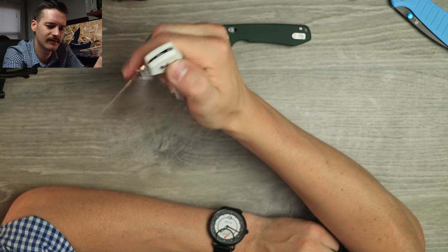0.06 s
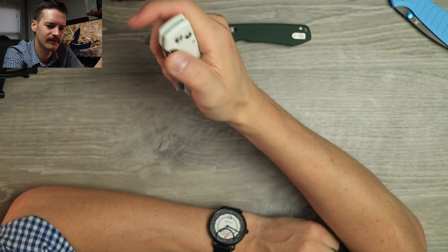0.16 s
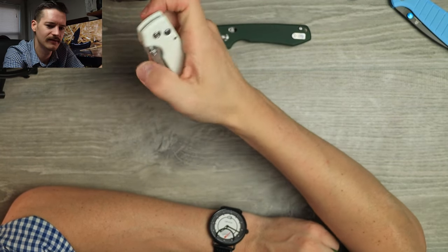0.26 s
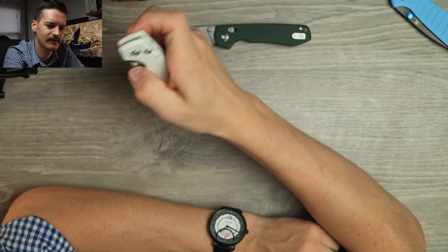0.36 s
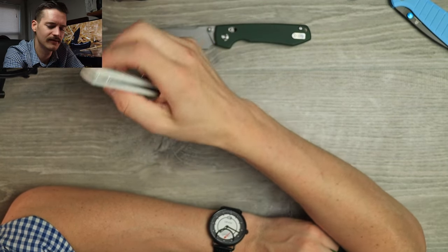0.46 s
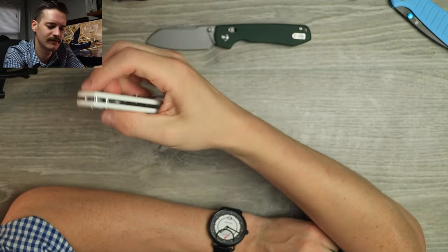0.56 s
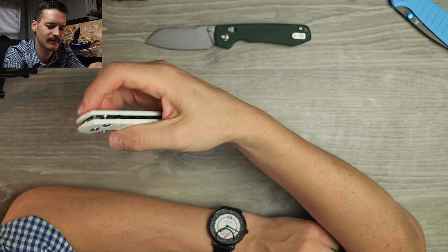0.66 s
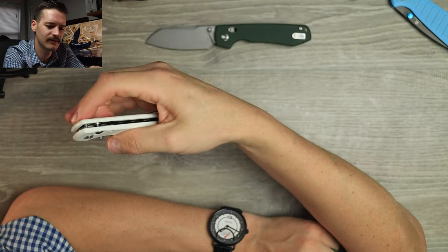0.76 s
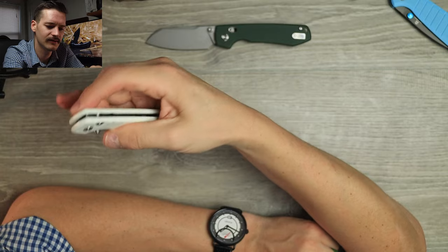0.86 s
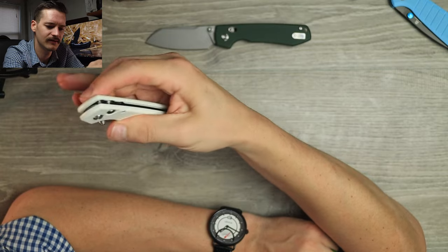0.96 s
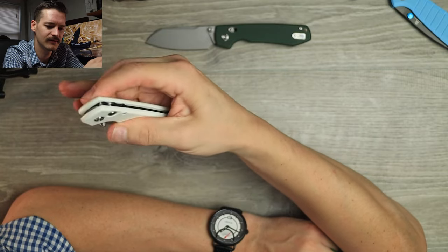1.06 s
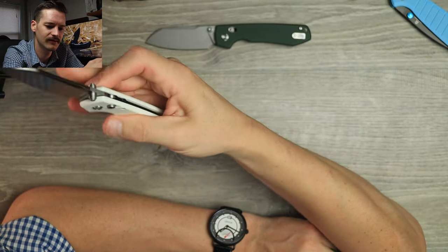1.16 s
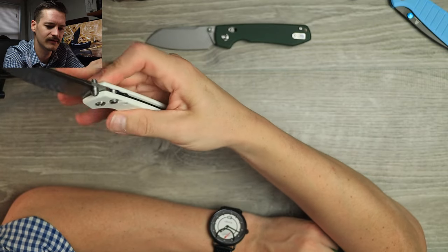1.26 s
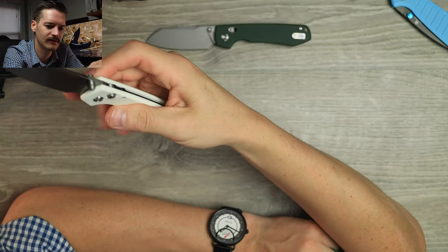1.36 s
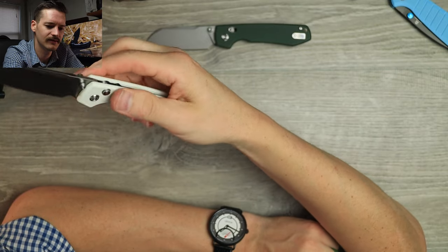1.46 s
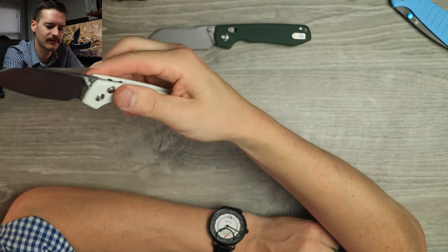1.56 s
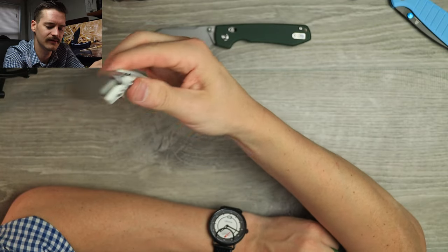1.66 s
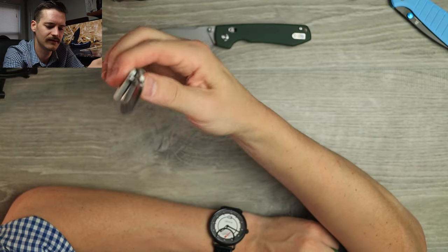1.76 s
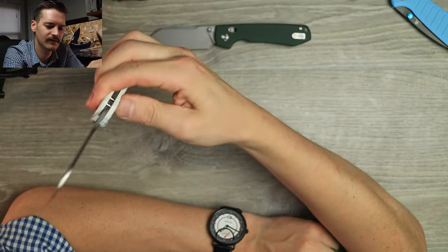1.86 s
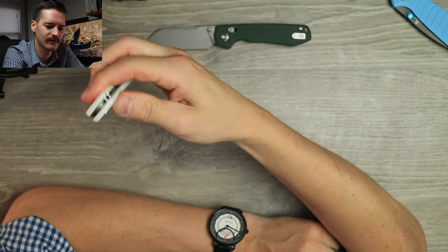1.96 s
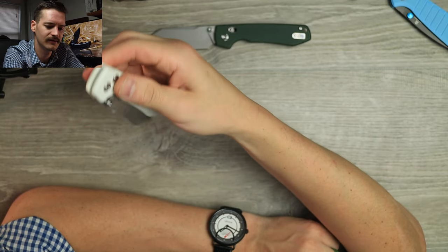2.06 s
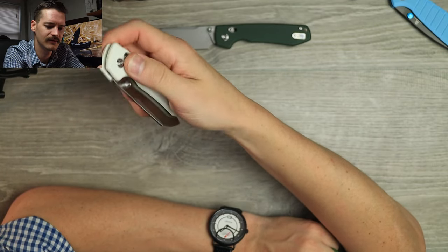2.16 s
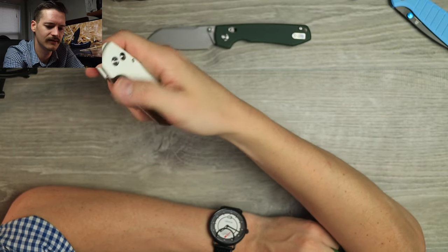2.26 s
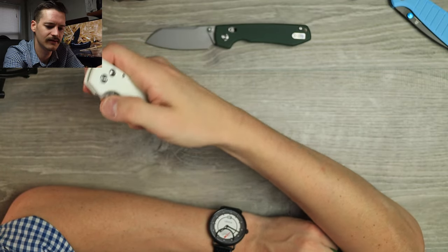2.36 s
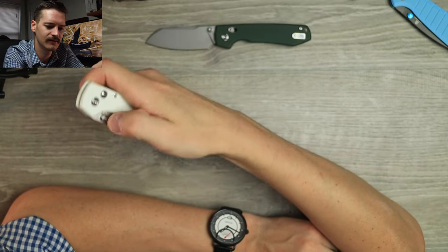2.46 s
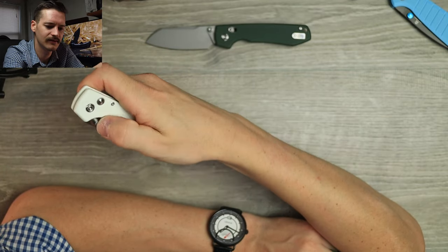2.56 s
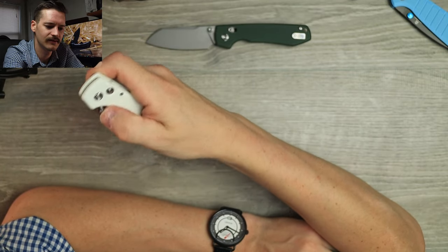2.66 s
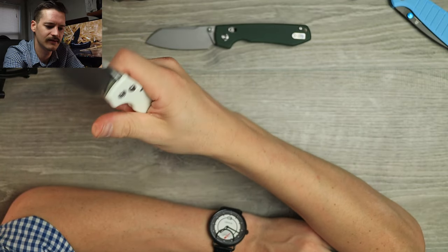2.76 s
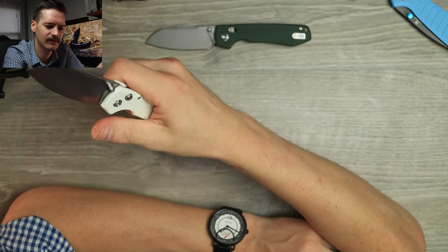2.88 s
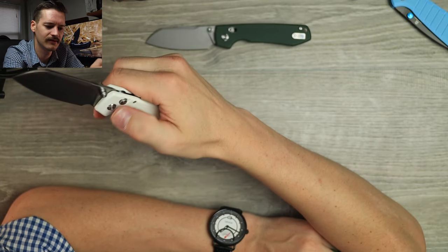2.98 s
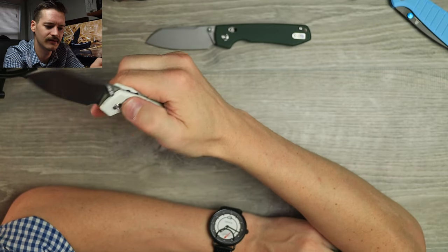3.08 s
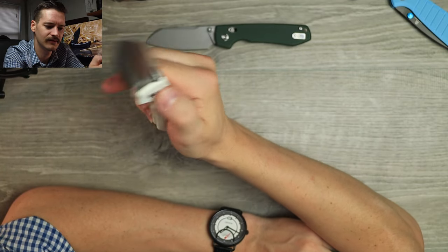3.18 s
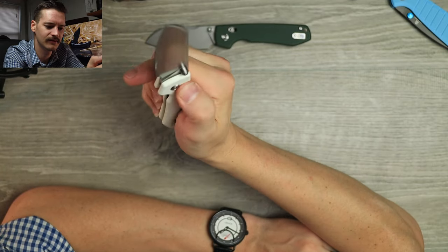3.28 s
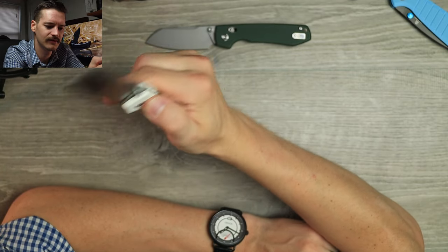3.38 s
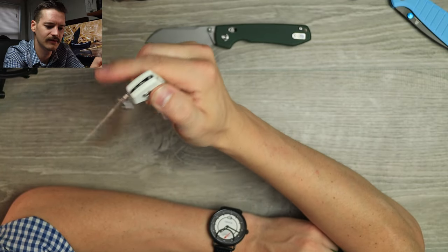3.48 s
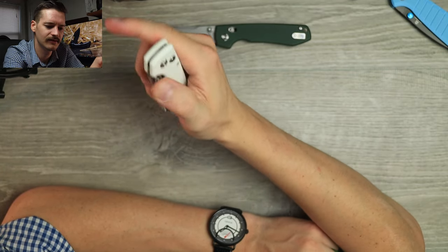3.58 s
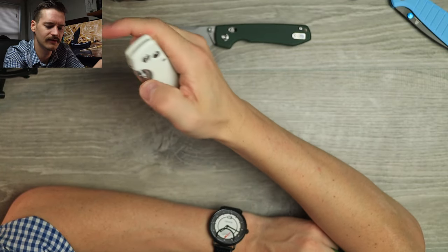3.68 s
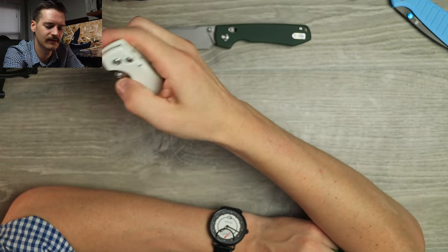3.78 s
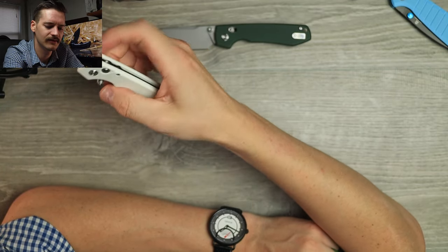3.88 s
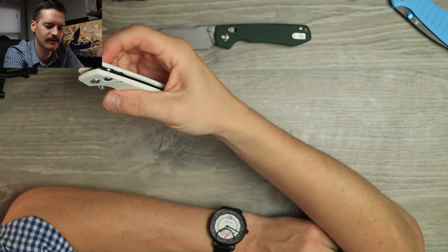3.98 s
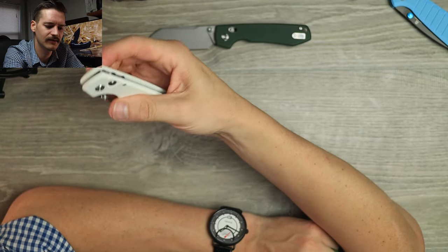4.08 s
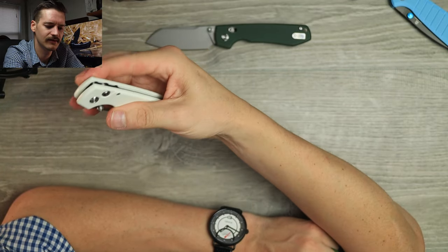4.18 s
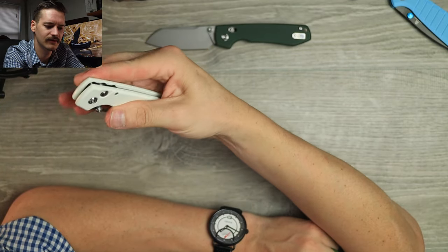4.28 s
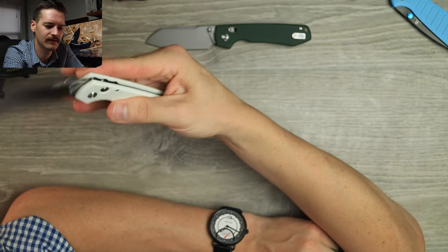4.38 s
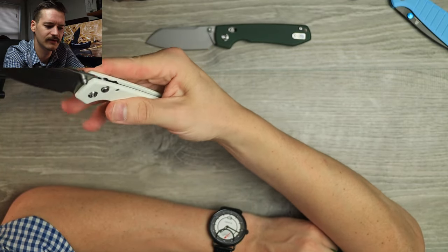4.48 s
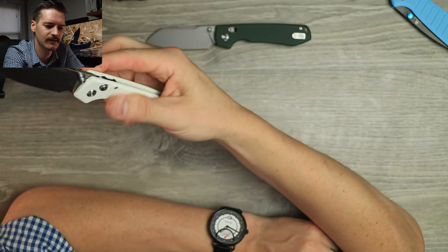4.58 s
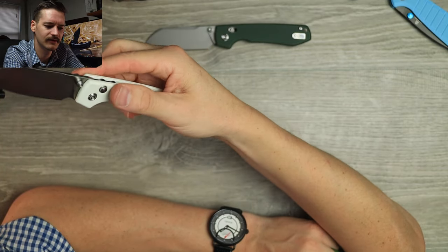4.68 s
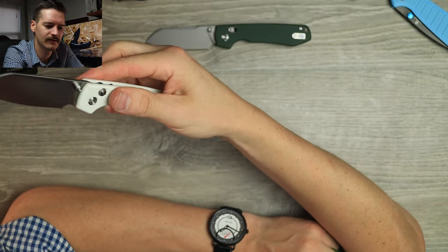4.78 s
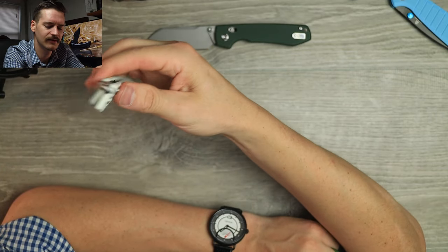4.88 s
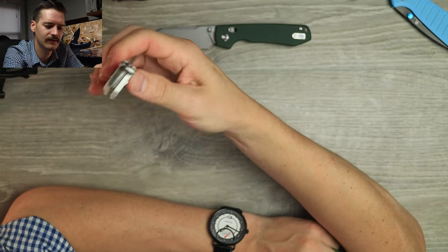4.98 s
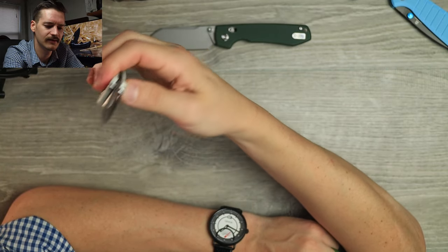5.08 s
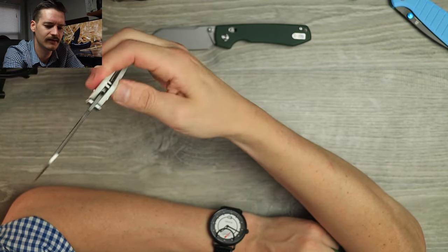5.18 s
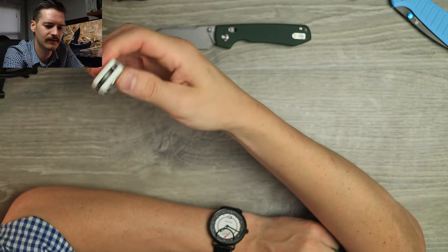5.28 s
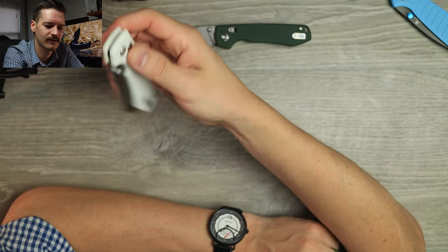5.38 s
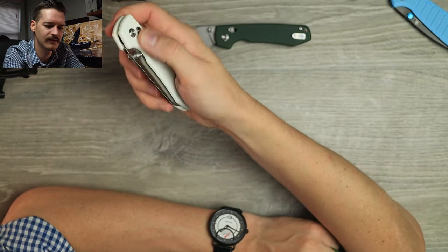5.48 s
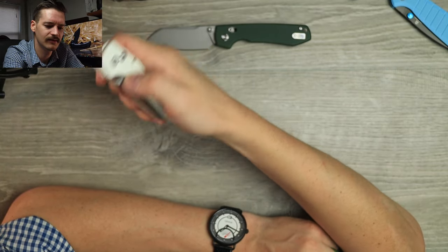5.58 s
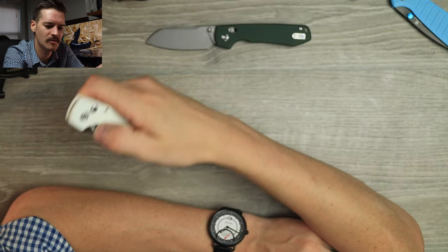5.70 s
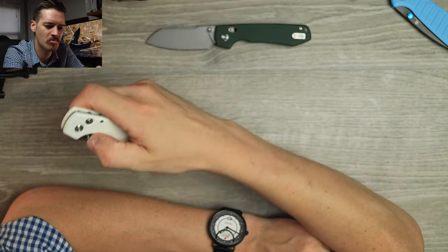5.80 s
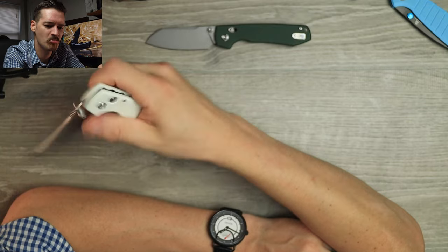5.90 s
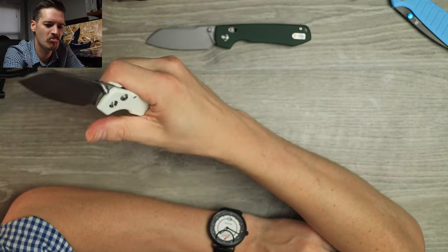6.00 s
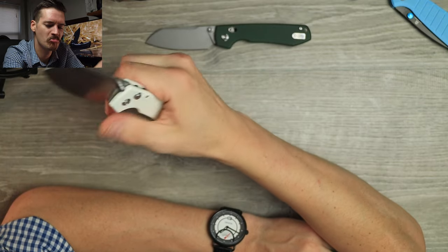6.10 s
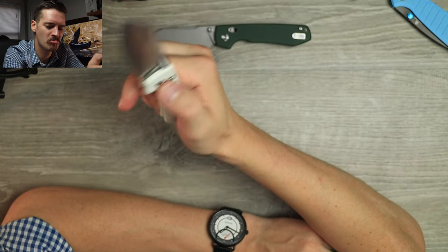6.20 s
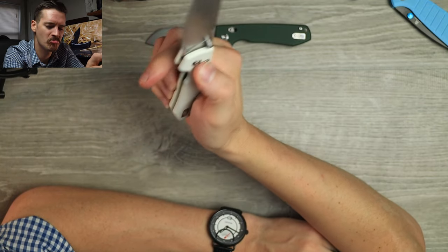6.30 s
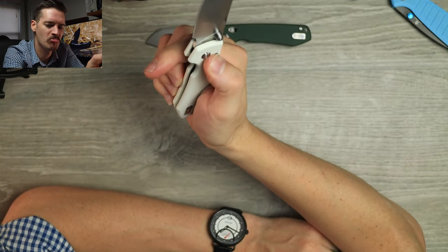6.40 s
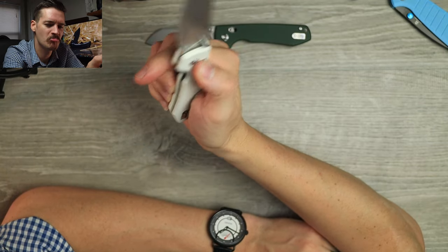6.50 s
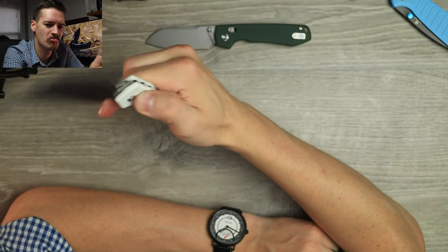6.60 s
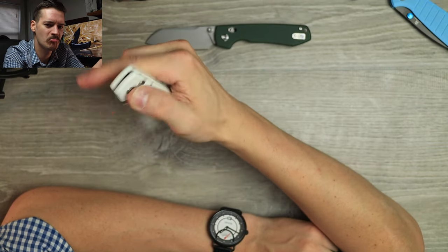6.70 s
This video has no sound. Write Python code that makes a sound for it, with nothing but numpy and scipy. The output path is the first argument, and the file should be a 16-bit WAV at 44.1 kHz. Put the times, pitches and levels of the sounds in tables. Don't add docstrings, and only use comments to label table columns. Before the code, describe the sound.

Close up in a small quiet room, a folding knife is flicked open and dropped shut four times with sharp steel snaps, faint ringing and finger rustle.

```python
import sys
import numpy as np
from scipy import signal
from scipy.fft import rfft, irfft
from scipy.io import wavfile
from scipy.ndimage import uniform_filter1d

SR = 44100
rng = np.random.default_rng(int(sys.argv[2]) if len(sys.argv) > 2 else 0)


def gain_from_db(level_db):
    decades = np.asarray(level_db, float) / 20
    return 10 ** decades


def generate_wav(sig):
    pcm = np.round(np.clip(np.atleast_2d(sig).T, -1, 1) * 32767).astype(np.int16)
    wavfile.write(sys.argv[1], SR, pcm)


N = 297536


def unit(x):
    return x / np.sqrt(np.mean(x ** 2))


def add(out, x, s):
    i = int(s * SR)
    out[i:i + len(x)] += x[:len(out) - i]


def coloured(gain, size=N):
    hz = np.maximum(np.fft.rfftfreq(size, 1 / SR), 1)
    return unit(irfft(rfft(rng.standard_normal(size)) * gain(hz), size))


def resonance(f, hz, width):
    return 1 / (1 + (2 * (f - hz) / width) ** 2)


def modes(hz, db, t60, size):
    t = np.arange(size)[:, None] / SR
    sign = (-1.) ** np.arange(len(hz))
    return sign * gain_from_db(db) * np.cos(2 * np.pi * hz * t) * 1000. ** (-t / t60)


# [f/Hz, width/Hz, level/dB]
FAN_BANDS = [(100, 12, -65), (1168, 45, -73), (1620, 190, -73)]


def fan():
    return sum(gain_from_db(db) * coloured(lambda f: resonance(f, hz, width)) for hz, width, db in FAN_BANDS)


# [f/Hz, level per Hz/dB]
AIR_SPECTRUM = [(20, 1), (33, -8.5), (65, -7.5), (100, -4.5), (150, -9.5), (250, -9), (450, -14.5),
                (650, -20.5), (1200, -20), (2000, -23), (3000, -30), (5000, -38), (9000, -43),
                (16000, -51.5)]


def air():
    hz, db = np.transpose(AIR_SPECTRUM)

    def gain(f):
        return gain_from_db(np.interp(np.log(f), np.log(hz), db)) * np.minimum(f / 14, 1) ** 2

    return gain_from_db(-56.5) * coloured(gain)


# [t/s, level/dB, f/Hz, t60/s, first swing up or down]
DESK_JOLTS = [(0.191, -31.5, 47, 0.11, -1), (1.208, -27, 23, 0.3, -1), (1.211, -34.5, 70, .2, -1),
              (2.058, -36.5, 32, 0.21, 1), (2.8, -37, 47.6, 0.35, 1), (3.59, -43.5, 19, 0.22, 1),
              (3.621, -42.5, 63, 0.198, 1), (4.462, -26, 32, .16, 1), (4.499, -30, 24, .3, 1),
              (5.39, -40.5, 30.4, 0.23, -1), (5.998, -35.5, 73, 0.18, 1), (6.044, -34, 41, 0.21, 1)]


def jolts():
    out = np.zeros(N)
    t = np.arange(SR // 2) / SR
    onset = 1 - np.exp(-t / 0.0053)
    for s, db, hz, t60, way in DESK_JOLTS:
        swing = np.sin(2 * np.pi * hz * t) * 1000. ** (-t / t60) * onset
        add(out, np.sign(way) * gain_from_db(db) * swing, s)
    return out


# [f/Hz, t60/s, level/dB]
ROOM_DECAY = [(500, 0.39, -5.5), (1990, 0.28, -2), (5000, 0.25, 1.5), (9986, 0.23, -1.5), (13000, 0.15, -1),
              (16020, .15, -4)]


def room():
    room_db, rise_s = -17, 0.0017
    desk_db, desk_s = 15.5, 0.0084
    wall_db, wall_s, wall_spread_s = 5, .024, .005
    t = np.arange(SR // 2) / SR
    hz, t60, db = np.transpose(ROOM_DECAY)
    tail = 0
    for centre in 250 * 2 ** np.arange(0, 6.1, .5):
        band = coloured(lambda f: np.exp(-(np.log2(f / centre) / 0.34) ** 2), size=len(t))
        band_db = np.interp(np.log(centre), np.log(hz), db)
        band_t60 = np.interp(np.log(centre), np.log(hz), t60)
        tail = tail + np.sqrt(centre) * band * gain_from_db(band_db) * 1000. ** (-t / band_t60)
    desk = desk_db * np.exp(-t / desk_s)
    wall = wall_db * np.exp(-((t - wall_s) / wall_spread_s) ** 2)
    tail = tail * (1 - np.exp(-t / rise_s)) * gain_from_db(desk + wall)
    return gain_from_db(room_db) * tail / np.sqrt(np.sum(tail ** 2))


# [release t/s, load level/dB, swing level/dB, swing length/s, handle rumble level/dB]
LAUNCH_STROKES = [
    (1.203, -48, -49, 0.053, -2.5),
    (2.793, -50.5, -49, 0.088, -1.5),
    (4.466, -46.5, -50, .038, 5.5),
    (6.001, -48, -48.5, 0.044, 5.5),
]
# [length/s, end level/dB, tilt/dB per octave]
FALL_STROKES = [(0.042, -52.5, 4), (0.057, -53, -2.5), (.07, -57, 4.5), (0.064, -56.5, -3.5)]
# [t/s, length/s, end level/dB, tilt/dB per octave]
FINGER_PRESSES = [(0.099, 0.043, -73, -11.5), (0.635, 0.044, -57, 1.5), (2.153, 0.085, -62, 2),
                  (2.276, 0.055, -68.5, 2), (2.411, .009, -56, -8), (2.624, .03, -68.5, -2.5),
                  (3.048, 0.037, -67.5, 5), (3.786, 0.034, -70, -2), (4.88, 0.093, -62, -0.5),
                  (5.155, 0.024, -72, -9)]
# [t/s, length/s, start level/dB, tilt/dB per octave]
FINGER_SLIDES = [(.333, 0.049, -69, -5.5), (0.492, 0.094, -67.5, -2), (1.498, 0.064, -63, -3),
                 (1.645, 0.029, -70, -7.5), (1.691, 0.072, -60.5, 1), (1.969, 0.035, -67.5, -6),
                 (2.443, .089, -74, -12), (2.57, .03, -70, 2.5), (2.988, .071, -68, -3.5),
                 (3.862, 0.065, -65.5, -2), (3.92, 0.088, -62, 7), (4.04, 0.056, -57, 1),
                 (4.15, 0.015, -55, 13), (4.234, 0.013, -61, 2), (4.676, 0.048, -56, -1.5),
                 (4.84, 0.036, -66.5, -6), (4.995, .025, -62.5, -6.5), (5.052, 0.053, -63.5, -9.5),
                 (5.468, 0.015, -62.5, 2), (5.502, 0.059, -63, 3), (5.568, 0.1, -64, 1),
                 (6.19, 0.058, -64.5, -4), (1.791, 0.023, -58, -6), (2.1, .05, -68, -5),
                 (5.663, .085, -72, -0.5), (5.221, 0.076, -77, -1), (2.733, 0.039, -71.5, -8.5),
                 (4.263, 0.0096, -70, 0.5), (5.826, 0.11, -78, -7)]


def strokes():
    load_s, fall_gap_s, finger_handle_db = 0.021, .005, -19.5
    out = []
    for s, load_db, swing_db, length, handle_db in LAUNCH_STROKES:
        out.append((s - load_s, load_s, load_db - 17, load_db, -0.15, -6.5))
        out.append((s - .004, length, swing_db, swing_db - 19, -1.5, handle_db))
    for (s, *_), (length, db, bright_db) in zip(SHUT_BLOWS, FALL_STROKES):
        out.append((s - fall_gap_s - length, length, db - 10.5, db, bright_db, -5.5))
    for s, length, db, bright_db in FINGER_PRESSES:
        out.append((s, length, db - 5, db, bright_db, finger_handle_db))
    for s, length, db, bright_db in FINGER_SLIDES:
        out.append((s, length, db, db - 8, bright_db, finger_handle_db))
    return out


def catches(n):
    return uniform_filter1d(np.repeat(rng.standard_normal(n // 200 + 1), 200), 150)[:n]


# [f/Hz, width/Hz, level/dB]
PIVOT_MODES = [(4500, 120, -8), (5395, 360, -2.5), (6270, 260, -5), (7640, 210, -5), (8400, 510, 2),
               (9450, 200, -8), (11700, 130, -4), (11900, 110, -5.5), (14100, 270, -8.5)]


def rubs():
    top_hz = 13100
    out = np.zeros(N)
    for s, length, start_db, end_db, bright_db, handle_db in strokes():
        n = int((length + 0.027) * SR)
        t = np.arange(n) / SR
        ripple_db = 2.5 * rng.standard_normal(12)

        def slope(f):
            ripple = np.interp(f, np.linspace(3000, 16000, num=12), ripple_db)
            return gain_from_db(bright_db * np.log2(f / 8000) + ripple) / np.hypot(1, (f / top_hz) ** 3)

        hiss = coloured(lambda f: slope(f) / np.hypot(1, (4200 / f) ** 4), size=n)
        sound = hiss * gain_from_db(2.5 * catches(n))
        for hz, width, db in PIVOT_MODES:
            line = coloured(lambda f: resonance(f, hz, width), size=n)
            level_db = db + 2.2 * rng.standard_normal() + 4.5 * np.repeat(catches(n), 2)[:n]
            sound += .36 * slope(hz) * gain_from_db(level_db) * line
        handle = coloured(lambda f: np.exp(-(np.log2(f / 2500) / 2.3) ** 2), size=n)
        handle = handle * gain_from_db(1.3 * catches(n))
        pressure = gain_from_db(1.8 * np.repeat(catches(n), 3)[:n])
        rise = np.clip(t / (0.25 * length), 0, 1) ** 0.93
        release = np.exp(-np.maximum(t - 0.96 * length, 0) / (0.002 + .1 * length))
        level = gain_from_db(np.interp(t, [0, length], [start_db, end_db]))
        add(out, (unit(sound) + gain_from_db(handle_db) * handle) * pressure * rise * release * level, s)
    return out


# [t/s, length/s, f/Hz, level/dB]
FINGER_SQUEAKS = [(1.648, .025, 8000, -72), (1.698, .065, 7950, -64), (1.7, .05, 4500, -71),
                  (1.945, 0.052, 10900, -81), (3.862, .03, 4500, -70), (3.863, 0.016, 8300, -71),
                  (5.5, 0.031, 5600, -68), (5.59, .05, 8500, -70)]


def squeaks():
    out = np.zeros(N)
    for s, length, hz, db in FINGER_SQUEAKS:
        n = int(length * SR)
        song = coloured(lambda f: resonance(f, hz, .036 * hz), size=n)
        add(out, gain_from_db(db) * np.sqrt(np.hanning(n)) * song, s)
    return out


# [t/s, f/Hz, level/dB, t60/s]
PART_PINGS = [(.224, 1890, -42, 0.066), (.226, 6600, -42, .03), (1.2045, 3400, -41, .03),
              (1.2045, 6500, -40, .03), (1.795, 8100, -50, .03), (1.795, 10900, -64, .045),
              (1.795, 13700, -64, 0.037), (2.42, 3030, -30, .022), (2.419, 4920, -34, 0.022),
              (2.42, 5720, -34, 0.025), (3.2475, 8200, -45, .018), (3.881, 4500, -57.5, .04),
              (3.923, 8500, -45, .015), (4.041, 8300, -43, .015), (5.564, 1960, -41, 0.036),
              (5.565, 3060, -46, 0.034), (5.564, 8260, -29, 0.02)]


def pings():
    out = np.zeros(N)
    for s, hz, db, t60 in PART_PINGS:
        add(out, modes(np.array([hz]), db, t60, size=SR // 10)[:, 0], s)
    return out


def blow(hz, width, db, chatter_ms, rebound_ms, rebound_db, lead_db=-24, lead_ms=1.4, crack_db=-10,
         damp=2.7, dull=0.017, seat_ms=50, choke_db=0):
    ms = np.arange(600) / SR * 1000
    force = 0
    for at_ms, size_db in ((0, lead_db), (lead_ms, 0), (lead_ms + rebound_ms, rebound_db)):
        since = ms - at_ms
        rattle = rng.standard_normal(len(ms)) * gain_from_db(2.6 * rng.standard_normal(len(ms)))
        rattle[np.argmax(since >= 0)] = 7
        fade = (since >= 0) * np.exp(-(since / max(chatter_ms, .1)) ** 2)
        force = force + gain_from_db(size_db) * fade * rattle
    reach = np.exp(-dull * np.maximum(ms - lead_ms, 0)[:, None] * hz / 1000)
    each = signal.fftconvolve(force[:, None] * reach, modes(hz, 0, damp / width, size=1500), axes=0)
    seated = (np.arange(len(each)) / SR * 1000 - lead_ms - seat_ms) / 0.53
    each = each * gain_from_db(choke_db * (1 + np.tanh(seated)) / 2)[:, None]
    sound = (each / np.linalg.norm(each, axis=0) * gain_from_db(db)).sum(axis=1)
    crack = np.diff(np.diff(force))
    sound[:len(crack)] += gain_from_db(crack_db) * crack / np.linalg.norm(crack)
    return sound / np.sqrt(np.sum(sound ** 2) / (0.0031 * SR))


# [t/s, peak level/dB, tilt/dB per octave, chatter/ms, knock level/dB]
PART_TICKS = [(0.2258, -31.5, -5.5, 0.69, -10), (1.2037, -22.5, 7, 0.59, -2.5),
              (2.4195, -20.5, -4.5, 0.27, -11), (2.796, -34.5, -2, 0.6, -3), (4.0408, -28.5, 8, 0.92, 1.5),
              (4.4669, -21, 14, 0.46, 5), (5.5634, -21.5, -2, 0.98, -11.5)]
# [t/s, peak level/dB, tilt/dB per octave]
NAIL_CLICKS = [(0.1472, -45.5, -8), (0.7215, -48, 1), (1.1819, -39.5, 8), (1.7948, -39, -1),
               (2.0036, -49, 1), (2.0172, -39, 1), (2.4265, -28.5, -2), (3.225, -39.5, -8),
               (3.247, -36, -3), (3.2594, -53, 1.5), (3.35, -50, -10), (3.3584, -40.5, -4),
               (3.4967, -55.5, 9), (3.8646, -48, -2), (3.881, -41.5, -6), (3.9232, -41.5, -4),
               (5.3142, -43.5, 5), (5.553, -41.5, -4), (6.263, -56.5, 4), (6.3394, -55, -4),
               (6.3676, -45, -10), (6.4744, -56, -3), (1.771, -56, 6), (1.861, -59, 3), (3.869, -49, 0),
               (3.875, -52, 2), (5.573, -39, 0)]


def ticks():
    out = np.zeros(N)
    hz, width, *grips = np.transpose(SHUT_MODES)
    nails = [(s, db, tilt_db, 0.99, -7 + .8 * tilt_db) for s, db, tilt_db in NAIL_CLICKS]
    for s, db, tilt_db, chatter_ms, knock_db in PART_TICKS + nails:
        colour_db = .5 * np.mean(grips, axis=0) + tilt_db * np.log2(hz / 5000)
        colour_db += knock_db * (hz < 3200) - 9 * (hz < 1500)
        colour_db += 3 * (abs(hz - 8500) < 700) - 8 * (hz > 9500) - 6 * (hz > 15000)
        colour_db += 2.5 * rng.standard_normal(len(hz))
        click = blow(hz, width, colour_db, chatter_ms, 2.5, -7.5, lead_db=-39.5, lead_ms=0.21,
                     crack_db=-6.5, damp=1.4)
        add(out, gain_from_db(db - 11.0) * click, s - .0003)
    return out


# [f/Hz, level/dB, t60/s]
DETENT_MODES = [(3400, 4, .035), (6300, 3, .035), (8300, 1.5, .035), (11100, 1.5, .03)]


def detent_chirps():
    out = np.zeros(N)
    chirp = modes(*np.transpose(DETENT_MODES), size=SR // 8).sum(axis=1)
    for s, _, swing_db, *_ in LAUNCH_STROKES:
        add(out, gain_from_db(swing_db) * chirp, s + .002)
    return out


def all_round(hz, width, db):
    f = np.fft.rfftfreq(512, 1 / SR)[:, None]
    power = (gain_from_db(2 * db) / width * resonance(f, hz, width) ** 1.5).sum(axis=1)
    pulse = np.fft.fftshift(irfft(np.sqrt(power))) * np.hanning(512)
    return pulse / np.sqrt(np.sum(pulse ** 2) / (0.0027 * SR))


# [f/Hz, width/Hz, level/dB in each snap..]
THUMB_MODES = [(318, 320.0, -36.0, -23.5), (730.0, 170.0, -22.5, -25.5), (1004.0, 110.0, -17.5, -17.5),
               (2000, 1000, -8, -12.5), (2360.0, 250.0, -10.0, -12), (3170.0, 380, -14.0, -23),
               (3560.0, 280.0, -8.5, -18), (4810, 370, -1.5, -1), (5880.0, 480.0, -9.5, -14.5),
               (6540.0, 240.0, -13.0, -27.5), (6900.0, 570.0, -9.0, -10.5), (8170, 450, -7, -10),
               (8920, 310.0, -9.5, -14), (10300, 1100, -9, -8), (11100, 1100, -9.0, -10.0),
               (12470.0, 420.0, -11.5, -19.5), (11700.0, 730.0, -11.0, -19), (14400, 430.0, -11.0, -15.5),
               (15800.0, 500.0, -29.0, -24)]
FLICK_MODES = [(300.0, 1000.0, -25.0, -23.5), (837.0, 300, -20.0, -25), (1260.0, 180.0, -19.5, -24.5),
               (1850, 730, -9.5, -12.5), (2860, 780.0, -1.5, -4.5), (3510, 650, -7, -7.0),
               (4980, 410, -1.5, -7), (6370, 1100, -7.0, -9.5), (7380, 300.0, -6.5, -10),
               (7950.0, 850.0, 1, 0), (8540, 1100, -1.0, -3), (9880, 200.0, -13.5, -10.0),
               (10720.0, 450, -13.0, -12), (11700, 840, -13.5, -14.5), (13030, 560, -18.5, -8.5),
               (13130, 520.0, -25.0, -15), (15200.0, 400.0, -21.0, -26.0)]
SHUT_MODES = [(360.5, 200.0, -32, -39.5, -41.5, -35.0), (934, 80.0, -19.5, -18, -25.5, -17.5),
              (1870, 110.0, -6.5, -11, -6.5, -4.5), (2120.0, 160, -16.5, -14.0, -14.5, -15.0),
              (2786.0, 180.0, -19, -14, -17.5, -15.5), (3050, 54, -11.0, -13.0, -11, -16.0),
              (3780, 940.0, -10.5, -12.0, -10.0, -8), (4910, 340.0, -8.0, -1.5, -9.0, 0),
              (5300, 330.0, -18, 1.5, -9.5, -5.0), (5800.0, 570.0, -17.5, -0.5, -8.0, 2),
              (6600, 450, 2.5, 1, 2.5, -5), (7530.0, 580.0, -16.5, -6.5, -12.5, -11.5),
              (8130, 520, -2.0, -8.0, -8, -4.5), (9057, 1600.0, -18.5, -7.0, -5.5, -3.5),
              (9780.0, 110, -32.0, -8.0, -12.0, -21.0), (11000.0, 310, -11, -16.0, -12.5, -19.0),
              (12000.0, 1100.0, -15, -10.0, -14.5, -17.0), (13700.0, 230.0, -13.5, -28.5, -8.5, -20.5),
              (14200.0, 230, -3.5, -22.5, -12, -10.5), (15000.0, 420.0, -17.0, -21.0, -15.5, -19.5)]
# [t/s, blow level/dB, chatter/ms, rebound level/dB, ring level/dB]
THUMB_BLOWS = [
    (1.234, -16.5, 2.2, -7, -10.5),
    (4.5047, -16, 1.6, 0.5, 0),
]
FLICK_BLOWS = [
    (2.839, -14.5, 2, -12, 0.88),
    (6.042, -14.5, 1.8, -11, 0.98),
]
SHUT_BLOWS = [
    (0.196, -20.5, 3.5, -3.5, -8.5),
    (2.0719, -19, 1.4, -2.5, -20),
    (3.6241, -21, 1.2, -4.5, -13),
    (5.39, -20.5, 2, -4.5, -13.5),
]
# [first touch level/dB, rebound after/ms, seated after/ms, choke level/dB]
THUMB_SEATING = [(-27, .9, 4.5, -5), (-28, 1.5, 4.6, -5.5)]
FLICK_SEATING = [(-30, 2.5, 5, -6), (-30, 2.4, 4.3, -5)]
SHUT_SEATING = [(-22.5, 2.3, 4.5, -11.5), (-16.5, 2.5, 5.5, -8), (-23.5, 2.4, 3.5, -12),
                (-11.5, 2.7, 4.68, -12)]
# [f/Hz, level/dB, t60/s]
THUMB_STEEL = [(3064, -50, 0.45), (3700, -54, .2), (4445, -54, .24), (4743, -38, 0.25), (4720, -36, .14),
               (4890, -43, .13), (4990, -49, .3), (5650, -48.5, 0.15), (6140, -50, .13), (6500, -51, .15),
               (9000, -47.5, .2), (10700, -52, .14)]
FLICK_STEEL = [(3040, -45.5, 0.36), (2880, -50, .17), (3690, -51, .18), (3770, -54, .2), (4680, -46, .19),
               (4840, -45, .24), (4893, -51, .25), (5045, -50, .25), (5600, -49, 0.16), (5860, -55, .22),
               (6400, -55, .25), (8500, -46, .2), (10900, -52, .14)]
SHUT_STEEL = [(1880, -55, .1), (940, -45.5, 0.045), (4790, -38.5, 0.15), (5310, -39, 0.16),
              (5860, -37, 0.18), (6220, -43.5, 0.19), (8550, -58.5, .13), (9800, -37.5, 0.097)]


def snap(near, walls, events, seats, body, ring, palm, send_db, tilt_db, thud_db, ring_send_db, dull):
    t = np.arange(2000) / SR
    thud = np.sin(2 * np.pi * 200 * t) * np.exp(-t / 0.0022)
    hz, width, *grips = np.transpose(body)
    ring_hz, mode_db, t60 = np.transpose(ring)
    notch_hz, notch_width_hz = palm
    notch = signal.iirnotch(notch_hz, notch_hz / notch_width_hz, fs=SR)
    for event, seat, grip_db in zip(events, seats, grips):
        s, blow_db, chatter_ms, rebound_db, ring_db = event
        lead_db, rebound_ms, seat_ms, choke_db = seat
        hit = blow(hz, width, grip_db, chatter_ms, rebound_ms, rebound_db, lead_db=lead_db,
                   dull=dull, seat_ms=seat_ms, choke_db=choke_db)
        add(near, gain_from_db(blow_db + 8.5) * signal.lfilter(*notch, hit), s - .0014)
        steel = gain_from_db(ring_db) * modes(ring_hz, mode_db, t60, size=SR // 2).sum(axis=1)
        add(near, steel, s)
        add(walls, gain_from_db(ring_send_db) * steel, s)
        add(near, -gain_from_db(thud_db) * thud, s)
        power_db = 0.88 * grip_db + tilt_db * np.log2(np.maximum(hz / 5000, 1))
        add(walls, gain_from_db(blow_db + 6.5 + send_db) * all_round(hz, 1.5 * width, power_db), s - .004)


def snaps():
    near, walls = np.zeros((2, N))
    snap(near, walls, THUMB_BLOWS, THUMB_SEATING, THUMB_MODES, THUMB_STEEL,
         (1570, 150), 3, -2, -34.5, -8.5, .017)
    snap(near, walls, FLICK_BLOWS, FLICK_SEATING, FLICK_MODES, FLICK_STEEL,
         (650, 180), 0.5, -4.5, -38.5, -8, .017)
    snap(near, walls, SHUT_BLOWS, SHUT_SEATING, SHUT_MODES, SHUT_STEEL,
         (1480, 550), 0.5, -1, -38.5, -4, -0.07)
    return near, walls


def scene():
    near, walls = snaps()
    handling = ticks() + rubs() + pings() + squeaks()
    reverberant = signal.fftconvolve(walls + handling, room())[:N]
    return (near + detent_chirps() + handling + reverberant + jolts() + air() + fan())[None]


def band_limit(x):
    return signal.sosfilt(signal.butter(12, 16410, fs=SR, output="sos"), x)


def record(dry):
    top = signal.ellip(8, .2, 60, 15750, fs=SR, output="sos")
    mix = np.clip(signal.sosfilt(top, dry), -1, 1)
    return band_limit(mix)


dry = scene()
out = record(dry)
generate_wav(out)
```